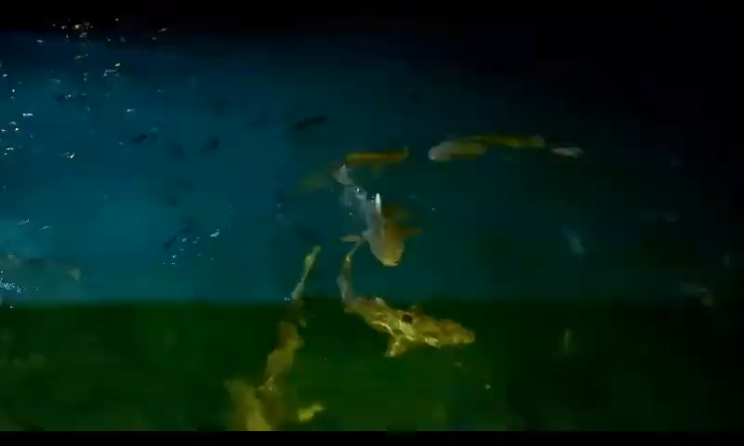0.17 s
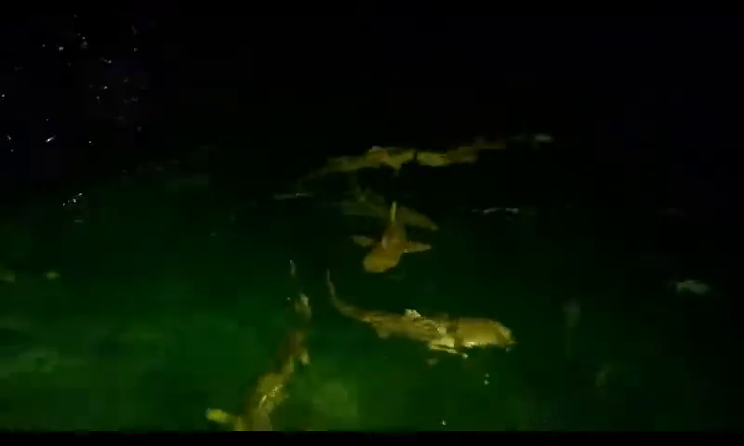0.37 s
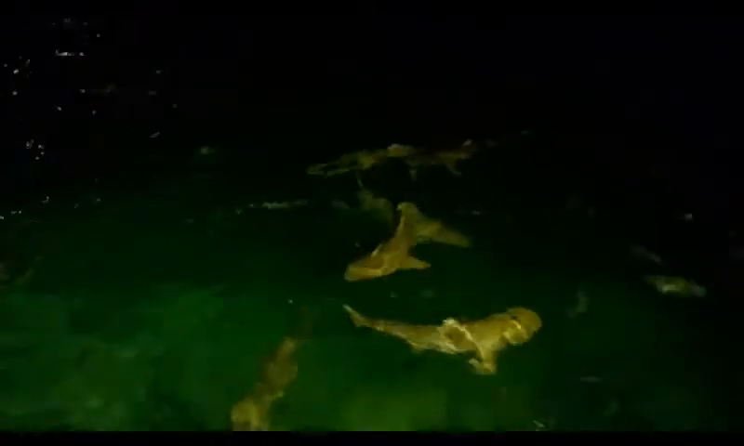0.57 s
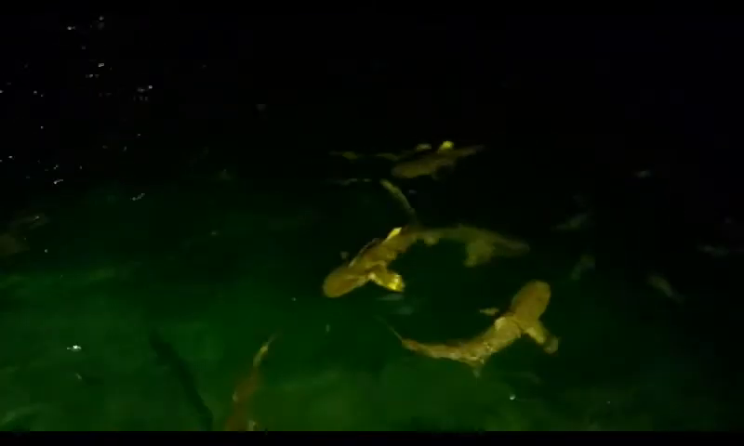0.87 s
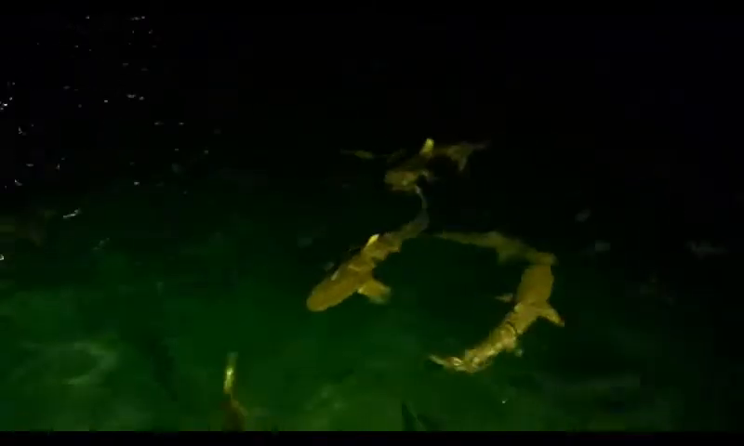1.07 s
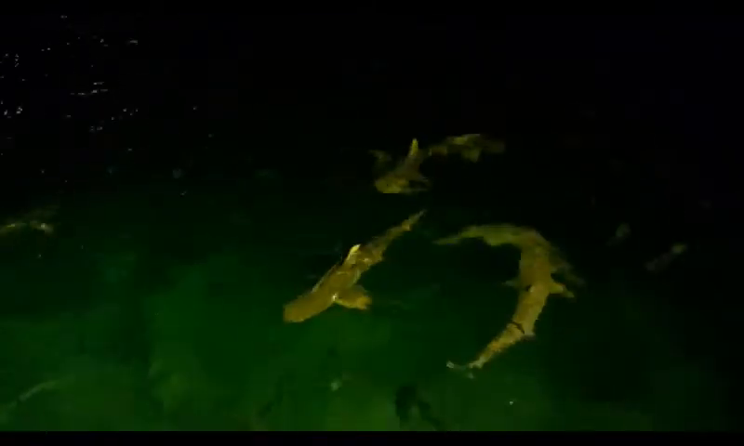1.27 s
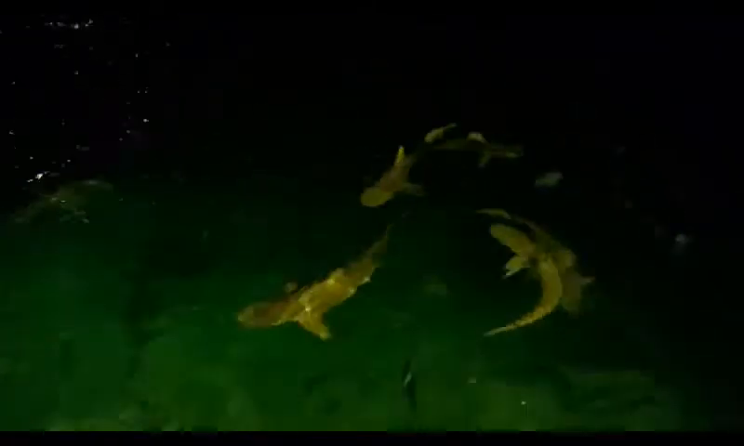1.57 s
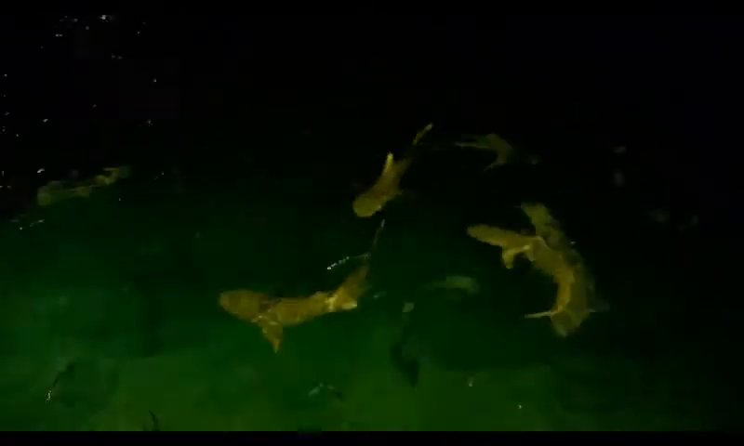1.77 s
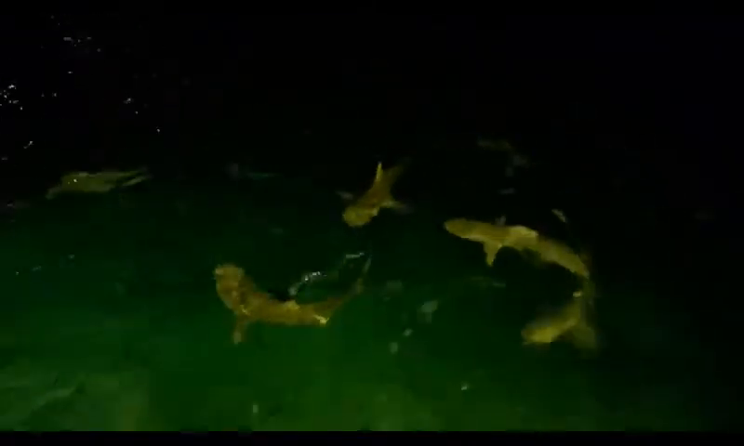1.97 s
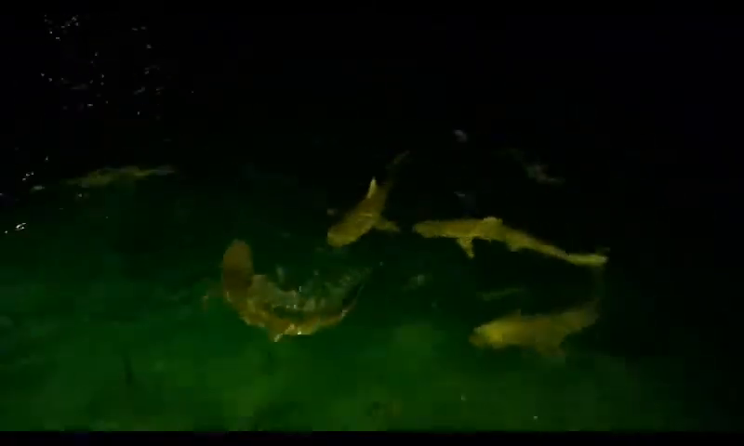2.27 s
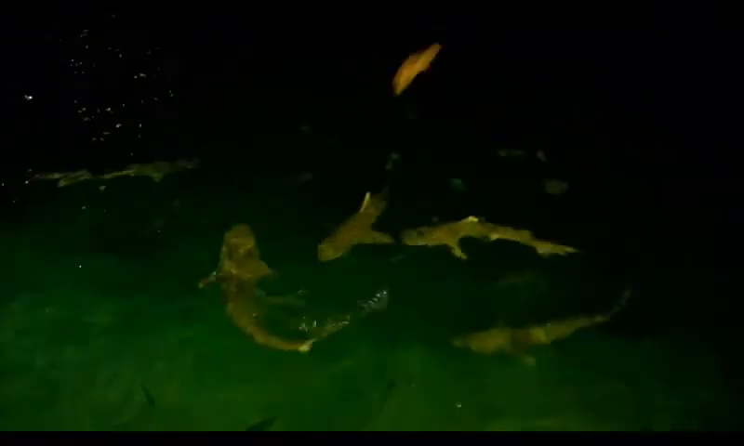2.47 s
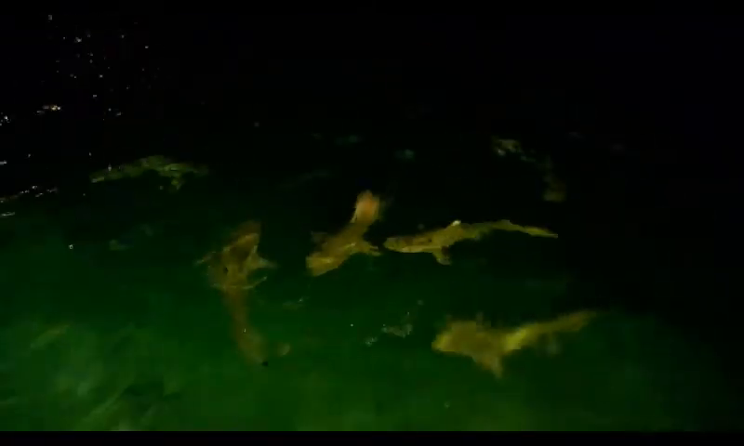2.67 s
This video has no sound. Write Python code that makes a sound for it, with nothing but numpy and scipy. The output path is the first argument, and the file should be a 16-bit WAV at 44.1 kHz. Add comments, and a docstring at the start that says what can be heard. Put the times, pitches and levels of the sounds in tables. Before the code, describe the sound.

Water laps and splashes as sharks circle at night, wind thudding on the microphone, ending with a sharp plop

```python
"""Wind buffets the two ports of a small camera by dark water at night, the left far harder: noise in two low bands
rumbles, and short bursts of noise with a steep top are the gusts. Under it water laps and gurgles as coloured noise
with short rings. Fish churn the surface into swells of fizz, rising sines are bubbles, and spits of noise are
droplets. Near the end a scrap of food smacks in: two spits through resonant bands, with a fading spray."""
import sys
import numpy as np
from scipy import signal
from scipy.fft import rfft, irfft
from scipy.io import wavfile
from scipy.ndimage import uniform_filter1d

SR = 44100
rng = np.random.default_rng(int(sys.argv[2]) if len(sys.argv) > 2 else 0)


def level_to_linear(level):
    """Convert decibel levels to linear amplitude factors, elementwise."""
    exponent = np.asarray(level, float) / 20
    return 10 ** exponent


def inscribe(sig):
    """Save sig as 16-bit PCM at rate SR to the path in sys.argv[1].

    A 1-D sig is mono; a 2-D sig holds one channel per row.
    Samples are clipped to [-1, 1] before scaling.
    """
    pcm = np.round(np.clip(np.atleast_2d(sig).T, -1, 1) * 32767)
    wavfile.write(sys.argv[1], SR, pcm.astype(np.int16))


N = 123921
T = np.arange(N) / SR
SMACK_LEFT_DB = 4  # smack and spray of the food are stronger on the left


def unit(x):
    """Scale to rms 1."""
    return x / np.sqrt(np.mean(x ** 2) + 1e-30)


def band(x, lo_hz, hi_hz, order=3):
    """Band-pass."""
    sos = signal.butter(order, [lo_hz, min(hi_hz, .45 * SR)], "band", fs=SR, output="sos")
    return signal.sosfilt(sos, x)


def colour(x, hz, db):
    """Shape by (Hz, dB) points: 40 dB down an octave below the first, level above the last."""
    log_hz = np.log(np.fft.rfftfreq(N, 1 / SR) + 1)
    curve = np.interp(log_hz, np.log(np.r_[hz[0] / 2, hz]), np.r_[db[0] - 40, db])
    return irfft(rfft(x) * level_to_linear(curve), N)


def walk(rate):
    """Random wander of rms 1, noise averaged twice over 1 / rate seconds."""
    k = int(SR / rate)
    return unit(uniform_filter1d(uniform_filter1d(rng.standard_normal(N), k), k))


def grains(per_s, lo_hz, hi_hz, cycles, spread_db):
    """Bed of tiny bursting bubbles: short rings at 14 pitches, of random time and size."""
    out = np.zeros(N)
    for hz in np.geomspace(lo_hz, hi_hz, num=14):
        size = level_to_linear(spread_db * rng.exponential(size=N).clip(0, 4))
        hits = (rng.random(N) < per_s / 14 / SR) * size
        p = np.exp(-hz / cycles / SR)  # the ring falls by a factor e in this many cycles
        ring = signal.lfilter([1, -1], [1, -2 * p * np.cos(2 * np.pi * hz / SR), p * p], hits)
        out += unit(ring) * np.sqrt(hz)
    return unit(out)


# Spectrum of the lapping water. Each row: frequency in Hz, left and right level in dB per Hz before the swell.
LAP_SPECTRUM = [(150, -50, -67), (203, -67, -71.5), (330, -76, -99.5), (500, -74, -81.5), (700, -80.5, -89),
                (1000, -84.5, -92), (1290, -87, -99), (1320, -89, -103), (2130, -94, -105),
                (2450, -101, -108), (4200, -102, -105), (5960, -108, -110), (9000, -120, -120)]
# Swell of the lapping. Each row: time in seconds, gain in dB.
LAP_SWELL = [(0, -5), (.2, -3), (.5, -4.5), (1, -7), (1.5, -5.5), (1.9, -5), (2.1, 2.5), (2.35, -3.5),
             (2.6, -4), (2.81, 0)]


def lapping():
    """Gurgling grains over a soft wash, unrelated at the two ports."""
    flicker_db = 2
    hz, *ports_db = np.array(LAP_SPECTRUM).T
    swell_db = np.interp(T, *np.array(LAP_SWELL).T)
    out = []
    for db in ports_db:
        gurgle = grains(1500, 261.6, 2960, cycles=2.25, spread_db=2.5)
        bed = unit(rng.standard_normal(N) + .55 * gurgle)
        wash = colour(bed, hz, db) * np.sqrt(SR / 2)  # spread per hertz
        out.append(wash * level_to_linear(swell_db + flicker_db * walk(13)))
    return np.array(out)


# Colour of the spray. Each row: frequency in Hz, relative level in dB.
SPRAY_COLOUR = [(700, -9), (1500, -4), (2500, -4), (3500, 0), (5500, 0), (8000, -7), (12000, -11),
                (15700, -15)]


def spray(bed, port_db):
    """Spray thrown up by the food: coloured noise that starts at once and fades evenly in dB."""
    start_s, level_db, t60_s = 2.761, -47, .5
    fade = (T > start_s) * level_to_linear(level_db - 60 * (T - start_s).clip(0) / t60_s)
    return fade * level_to_linear(port_db) * unit(colour(bed, *np.array(SPRAY_COLOUR).T))


# Colour of the fizz. Each row: frequency in Hz, relative level in dB.
FIZZ_COLOUR = [(1800, 2), (2500, -4), (3260, 8), (4160, 6), (5400, 9), (7000, 5.5), (8700, -5), (9900, -12),
               (11500, -10), (13100, -10), (15700, -14.5)]
# Swells of surface fizz. Each row: start, peak and end in seconds, level in dB before a 3 dB lift,
# treble relative to that in dB, left minus right in dB.
FIZZ_SWELLS = [(-.04, 0.058, 0.15, -62.5, 0, -3), (0.099, 0.155, 0.24, -59.5, -1.5, -3),
               (0.2, 0.239, 0.2654, -65, -3, 0), (0.617, 0.64, 1.05, -76, 0, -6.5),
               (0.691, 0.778, 0.897, -69.5, 0.5, -2.5), (0.849, 0.921, 1.04, -67, -2.5, -3.5),
               (0.993, 1.018, 1.15, -66.5, 1.5, -3), (1.099, 1.244, 1.42, -67, 2.5, -4),
               (1.28, 1.412, 1.53, -66, 1, -4.5), (1.449, 1.53, 1.64, -71.5, 1.5, -6),
               (1.69, 1.726, 1.766, -70, 5, -3.5), (1.6, 1.77, 1.88, -70.5, -7, 2.5),
               (2.086, 2.151, 2.223, -57, 1, 1), (2.15, 2.282, 2.41, -66.5, -2.5, 5.5),
               (2.48, 2.535, 2.9, -72, -2, 4.5), (2.628, 2.712, 3.7, -67.5, -2.5, 0)]


def fizz():
    """Foam and spray where fish break the surface, in swells over a faint floor, then the food's spray."""
    floor_db = np.array([[-77], [-77 - 7.5]])  # main band, treble; before the 3 dB lift
    flicker = level_to_linear(2 * walk(90))
    out = []
    for side in (1, -1):  # left, right
        bursts = grains(9000, 2040, 15000, cycles=1.0, spread_db=2.5)
        bed = unit(rng.standard_normal(N) + .6 * bursts)
        foam = colour(bed, *np.array(FIZZ_COLOUR).T)
        foam = foam / np.std(band(foam, 4000, 8000))  # main level is that of 4-8 kHz
        main, treble = band(foam, 1000, 9500), unit(band(foam, 9500, 17000))
        power = level_to_linear(2 * floor_db)
        for start, peak, end, db, treble_db, pan_db in FIZZ_SWELLS:
            rise_fall = np.interp(T, [start, peak, end], [0, 1, 0])
            gate = np.sin(np.pi / 2 * rise_fall) ** 2.4
            power = power + gate * level_to_linear(2 * np.array([[db], [db + treble_db]]) + side * pan_db)
        gain = np.sqrt(2 * power)  # the 3 dB lift
        swells = (main * gain[0] + treble * gain[1]) * flicker
        out.append(swells + spray(bed, SMACK_LEFT_DB * (side > 0)))
    return np.array(out)


# Bubbles. Each row: start in seconds, starting pitch in Hz, level in dB midway between the ports,
# length in seconds, left minus right in dB.
BUBBLES = [(.204, 1770, -53, 0.019, 16), (1.003, 1660, -53, 0.016, 23.5), (1.698, 418.7, -39, 0.11, 10),
           (1.74, 760, -47.5, 0.029, 10), (1.981, 480.4, -43.5, 0.12, 9), (1.994, 965, -50.5, 0.116, 10.5),
           (2.062, 456, -37.5, 0.0435, 12.5), (2.069, 1096, -46, 0.075, 11), (2.15, 2990, -46, 0.019, 3),
           (2.259, 1700, -58, 0.033, 25), (2.288, 2370, -53, 0.021, 15), (2.331, 2540, -48, 0.0099, 6),
           (2.585, 418, -49, 0.13, 20.5)]


def bubbles():
    """Each bubble is a sine that creeps upward, fading 30 dB on a slope while a cosine closes it."""
    rise_per_s, attack_s = 2 * 0.553, 0.002  # rise as a share of the starting pitch
    out = np.zeros((2, N))
    for start, hz, db, length, pan_db in BUBBLES:
        i = int(start * SR)
        t = T[:min(int(length * SR), N - i)]
        tone = np.sin(2 * np.pi * hz * (t + rise_per_s / 2 * t * t))
        fade = level_to_linear(db - 30 * t / length) * np.cos(np.pi / 2 * t / length)
        attack = np.minimum(t / attack_s, 1)
        out[:, i:i + len(t)] += tone * fade * attack * level_to_linear(np.array([[pan_db / 2], [-pan_db / 2]]))
    return out


def spit(t0, db, t60):
    """Envelope of a quick spit of noise: a straight rise under a fade that is even in dB."""
    rise = ((T - t0) / (.08 * t60)).clip(0, 1)
    return rise * level_to_linear(db - 60 * (T - t0).clip(0, 1) / t60)


# Droplets. Each row: start in seconds, drive in dB ahead of the band-pass and doubling,
# 60 dB fade time in seconds, centre in Hz.
DROPLETS = [(0.094, -56, .01, 5470), (.105, -44, .008, 9000), (.166, -41.5, 0.042, 3030),
            (0.207, -45, .02, 5240), (0.234, -46, 0.011, 7000), (1.477, -50.5, 0.0074, 9000),
            (1.517, -47, .01, 7000), (1.56, -56.5, 0.0075, 13060), (1.775, -49, 0.01, 4630),
            (1.857, -51, 0.014, 5370), (1.874, -57, 0.0095, 7030), (2.446, -46.5, .014, 3600),
            (2.465, -49, 0.016, 2820), (2.6627, -46, 0.0067, 12100), (2.677, -52.5, .006, 11000),
            (2.7017, -43, 0.0096, 9000), (2.7118, -46, .006, 10100), (2.7262, -45.5, 0.0094, 6950),
            (2.7388, -44.5, 0.007, 10860), (2.746, -61, .006, 11000)]


def drops():
    """Each droplet spits broad noise around its own pitch."""
    reach = 2 ** 0.55  # 0.55 octave each side of the centre
    noise = np.sign(rng.standard_normal((2, N)))
    out = np.zeros((2, N))
    for t0, db, t60, hz in DROPLETS:
        i = slice(int(t0 * SR), int((t0 + 2 * t60) * SR))
        drive = (spit(t0, db, t60) * noise)[:, i]
        out[:, i] += 2 * band(drive, hz / reach, hz * reach, order=2)
    return out


# The smack of the food and its rebound. Each row: start in seconds, drive in dB ahead of the rings,
# 60 dB fade time in seconds.
SMACK_HITS = [(2.7598, -15, .005), (2.766, -25, .012)]
# Rings of the struck surface. Each row: centre in Hz, width in Hz, gain in dB before doubling.
SMACK_RINGS = [(1100, 700, -19), (2000, 1000, -18), (4450, 400, 5), (7100, 600, -6), (9800, 1500, -22),
               (12800, 2500, -24)]


def smack():
    """Food strikes the water: spits of noise ring the surface through band-pass resonances."""
    noise = np.sign(rng.standard_normal((2, N)))
    hit = sum(spit(*row) for row in SMACK_HITS) * noise * level_to_linear(np.array([[SMACK_LEFT_DB], [0]]))
    out = np.zeros((2, N))
    for hz, width, db in SMACK_RINGS:
        out += 2 * level_to_linear(db) * band(hit, hz - width / 2, hz + width / 2, order=1)
    return out


# The two rumble bands. Each row: low edge in Hz, high edge in Hz.
RUMBLE_BANDS = [(16, 74.9), (90, 216)]


def rumble(levels):
    """Slow eddies thud on the port: two bands of low noise share a quick flutter."""
    evenness = 0.19  # share of the random flutter ironed out
    seconds, *bands_db = np.array(levels).T
    flutter = level_to_linear(2.5 * walk(18))
    out = np.zeros(N)
    for (lo, hi), db in zip(RUMBLE_BANDS, bands_db):
        x = band(rng.standard_normal(N), lo, hi, order=2)
        power = uniform_filter1d(x ** 2, int(SR / lo)) + 1e-12
        x = band(x / power ** (evenness / 2), lo * 0.58, hi * 1.476, order=2)
        out += unit(x * flutter) * level_to_linear(np.interp(T, seconds, db))
    return out


def gust(air, t, reach, db, top_hz, skirt_db):
    """One burst of faster eddies, steep at its top with a faint skirt above: start index and sound."""
    low_hz = 34.4
    i, j = max(int((t - reach) * SR), 0), min(int((t + reach) * SR), N)
    shape = np.cos(np.pi / 2 * (T[i:j] - t) / reach) ** 4
    x = air[max(i - 3000, 0):j]  # run-in lets the filters settle
    favoured = band(x, .5 * top_hz, top_hz, order=1)  # eddy sizes that stand out
    x = band(x, low_hz, top_hz, order=2) + level_to_linear(-3) * favoured
    body = band(x, low_hz / 2, 1.003 * top_hz, order=4)
    skirt = level_to_linear(skirt_db) * band(x, top_hz, 2000, order=2)
    x = (body + skirt)[-(j - i):] * shape
    return i, unit(x) * np.sqrt(np.mean(shape ** 2)) * level_to_linear(db)


def wind(levels, gusts, skirt_db):
    """Rumble on one port, with gusts cut from uneven noise that falls 6 dB an octave above a tilt."""
    tilt_hz, spike_db = 150, 5
    out = rumble(levels)
    uneven = rng.standard_normal(N) * level_to_linear(spike_db * walk(234))
    air = signal.lfilter([1], [1, -np.exp(-2 * np.pi * tilt_hz / SR)], uneven)
    for row in gusts:
        i, x = gust(air, *row, skirt_db)
        out[i:i + len(x)] += x
    return out


# Rumble at the right port. Each row: time in seconds, level in dB of the lower band, of the upper band.
RUMBLE_RIGHT = [(0, -38, -42), (.2, -38, -42), (.38, -43, -43), (.5, -35, -38), (.74, -35, -40),
                (.9, -42, -42), (1.1, -39, -44), (1.22, -31, -38), (1.34, -43, -49), (1.47, -45, -50),
                (1.6, -37, -44), (1.75, -38, -42), (1.9, -45, -47), (2.3, -43, -46), (2.81, -44, -48)]
# Gusts across the right port. Each row: centre in seconds, reach each side in seconds, level in dB,
# top of the eddies in Hz.
GUSTS_RIGHT = [(0.459, 0.093, -31, 713), (0.507, .02, -42, 500), (0.578, 0.028, -30, 836),
               (0.692, 0.082, -36, 660), (0.747, 0.0317, -34, 500), (0.844, 0.063, -37.5, 750),
               (0.91, 0.0097, -30.5, 700), (1.015, 0.074, -42.5, 700), (1.191, 0.1, -33.5, 700),
               (1.243, 0.078, -34.5, 900), (1.39, 0.021, -45.5, 500), (1.563, 0.072, -35.5, 530),
               (1.684, 0.069, -45, 500), (2.124, 0.05, -44, 400)]


def right_wind():
    """The weaker wind, its eddies pressing lightly on the right port."""
    return wind(RUMBLE_RIGHT, GUSTS_RIGHT, skirt_db=-20)


# Rumble at the left port. Each row: time in seconds, level in dB of the lower band, of the upper band.
RUMBLE_LEFT = [(0, -21, -33), (.14, -19, -32.5), (.26, -22, -28.5), (.38, -18, -38), (.5, -15, -34),
               (.62, -20.5, -29.5), (.74, -20, -31.5), (.9, -22.5, -33), (1.1, -19.5, -34),
               (1.22, -12.5, -27), (1.4, -20.5, -25.5), (1.52, -23, -34), (1.6, -16.5, -34.5),
               (1.71, -28, -35.5), (1.84, -13, -44), (1.95, -23.5, -38.5), (2.1, -22.5, -40.5),
               (2.3, -20.5, -35.5), (2.45, -24, -40), (2.57, -22, -45), (2.67, -23, -48),
               (2.81, -15.5, -50)]
# Gusts across the left port. Each row: centre in seconds, reach each side in seconds, level in dB,
# top of the eddies in Hz.
GUSTS_LEFT = [(0.121, 0.027, -14.5, 134), (0.176, 0.047, -19.5, 220), (0.296, 0.077, -19.5, 174),
              (0.439, 0.079, -25.5, 430), (0.563, 0.015, -28, 500), (0.612, 0.022, -11, 763),
              (0.617, 0.0046, -11.5, 965), (0.66, 0.015, -23, 601), (0.673, 0.028, -15, 150),
              (0.753, 0.0074, -42, 500), (0.803, 0.013, -8.5, 770), (0.815, 0.01, -11.5, 477),
              (0.856, 0.015, -29, 500), (0.902, 0.039, -26.5, 500), (0.969, 0.021, -18.5, 330),
              (1.084, 0.016, -29, 416), (1.147, 0.01, -9, 240), (1.169, 0.018, -11, 590),
              (1.185, 0.004, -12, 890), (1.199, 0.019, -11.5, 182), (1.247, 0.0065, -25.5, 610),
              (1.292, 0.026, -9, 330), (1.307, 0.015, -12.5, 700), (1.325, 0.0075, -13.5, 700),
              (1.345, 0.012, -16.5, 640), (1.364, 0.016, -15, 543), (1.43, 0.033, -13.5, 308),
              (1.461, 0.013, -13, 556), (1.473, 0.0097, -17.5, 750), (1.487, 0.014, -19, 500),
              (1.561, 0.049, -19, 202), (1.691, 0.022, -12.5, 106), (1.865, 0.026, -30.5, 220),
              (2.123, 0.0073, -13, 440), (2.149, 0.023, -14.5, 128), (2.226, 0.02, -29, 330),
              (2.78, 0.03, -24, 243)]


def left_wind():
    """The far harder wind, its eddies beating on the left port."""
    return wind(RUMBLE_LEFT, GUSTS_LEFT, skirt_db=-17)


def scene():
    """The water at both ports plus separate wind on each."""
    water = lapping() + fizz() + bubbles() + drops() + smack()
    return water + np.array([left_wind(), right_wind()])


def band_limit(x):
    """A steep low-pass at the top of the band."""
    return signal.sosfilt(signal.butter(12, 15810, fs=SR, output="sos"), x)


def record(dry):
    """Low-pass the mix steeply above 15.8 kHz."""
    low_pass = signal.ellip(8, .2, 70, 15800, fs=SR, output="sos")
    mix = signal.sosfilt(low_pass, dry)
    return band_limit(mix)


dry = scene()
out = record(dry)
inscribe(out)
```